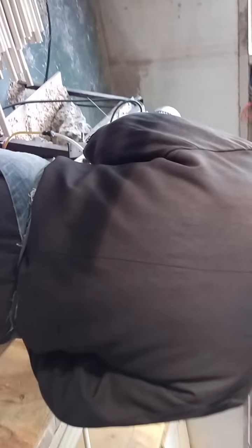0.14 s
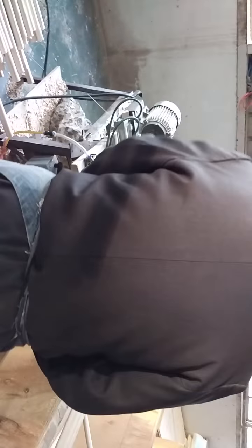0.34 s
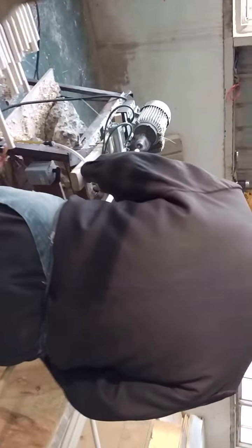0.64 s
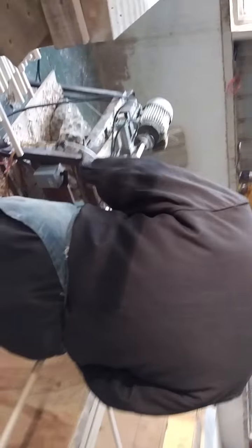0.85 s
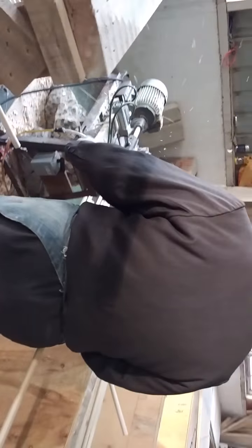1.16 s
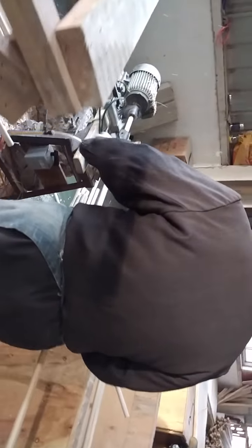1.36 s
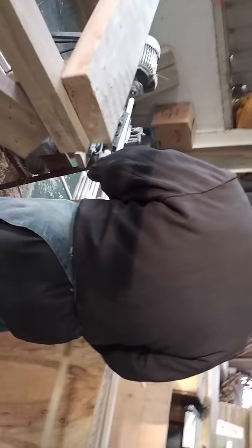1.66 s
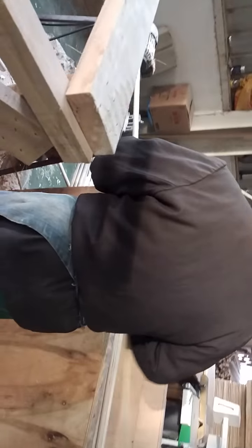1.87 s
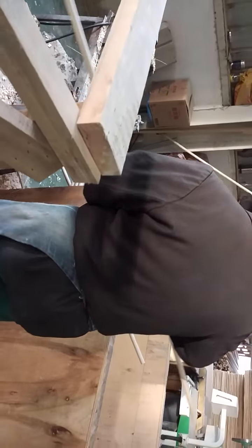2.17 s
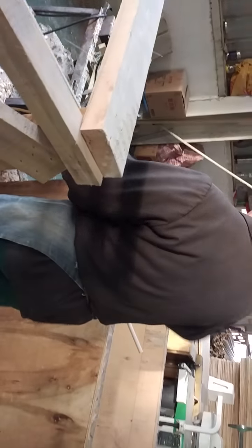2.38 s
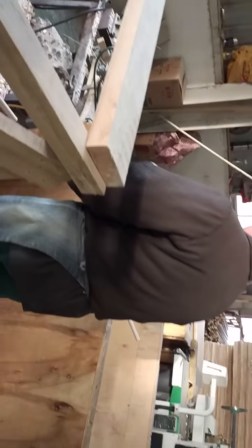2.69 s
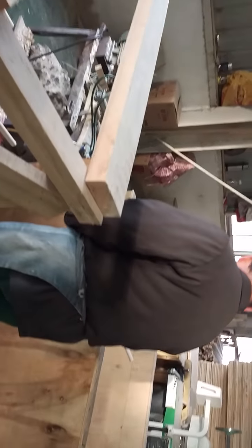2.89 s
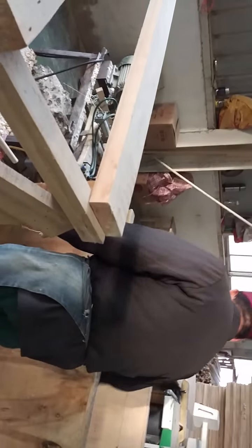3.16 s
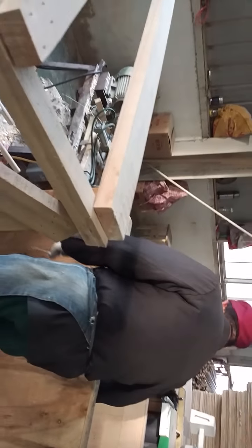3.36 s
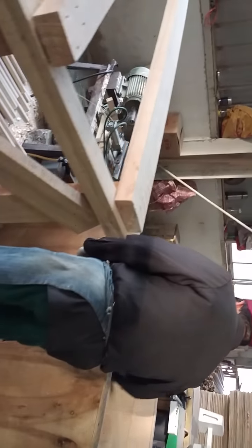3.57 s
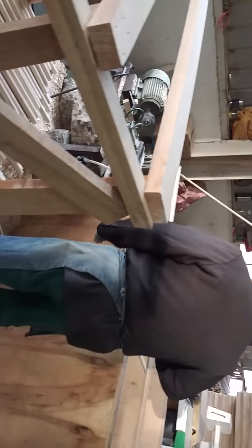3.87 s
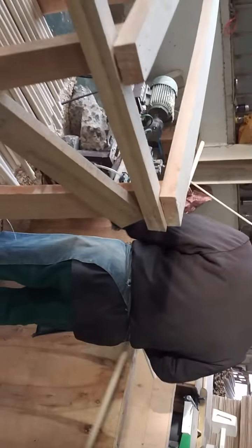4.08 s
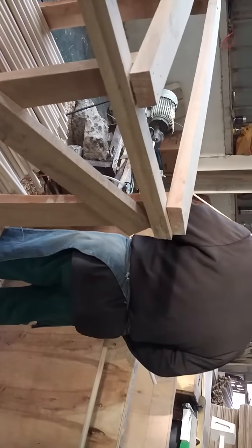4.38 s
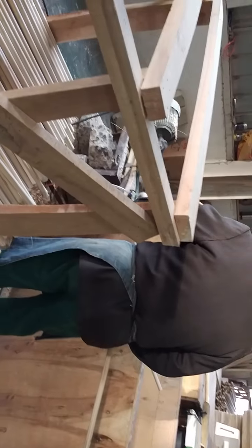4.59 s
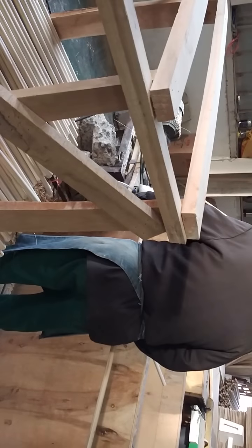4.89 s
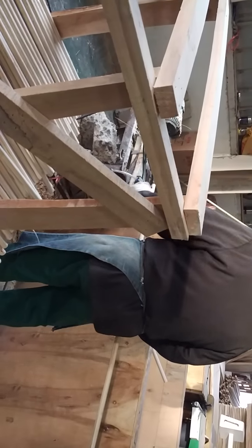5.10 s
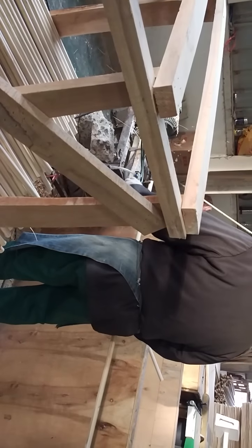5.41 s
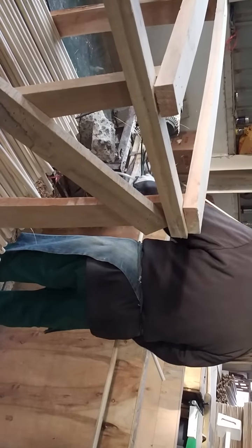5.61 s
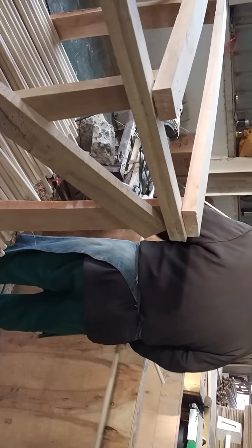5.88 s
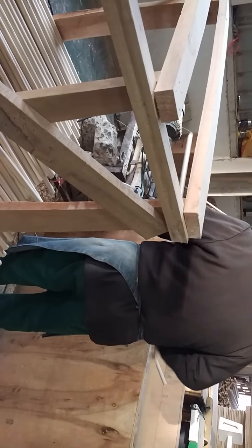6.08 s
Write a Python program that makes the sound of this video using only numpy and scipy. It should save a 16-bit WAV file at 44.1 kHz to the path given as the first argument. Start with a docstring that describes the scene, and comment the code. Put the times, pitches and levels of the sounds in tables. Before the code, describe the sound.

Spinning cutters sing with a throbbing, buzzing whine over hissing wood chips, while compressed air puffs briefly and a stick drops on a board.

```python
"""In a factory hall, a wood moulder mills thin sticks. Its two six-knife cutter heads turn at slightly
different speeds, so they sing and throb; the tones swell and fade as the listener moves through the
hall's standing waves (its loud and quiet spots). Chips rush off the knives; an air valve's puffs and
one sharp tick make the gain control dip. Halfway, a stick clacks and drops on a board."""
import sys
import numpy as np
from scipy import signal
from scipy.fft import irfft, next_fast_len
from scipy.io import wavfile
from scipy.ndimage import uniform_filter1d, map_coordinates

SR = 44100
rng = np.random.default_rng(int(sys.argv[2]) if len(sys.argv) > 2 else 0)


def materialize(psi):
    """Save the field psi as 16-bit PCM at rate SR to the path in sys.argv[1].

    A 1-D psi becomes a single channel; in a 2-D psi each row is a channel.
    """
    bounded = np.clip(np.atleast_2d(psi).T, -1, 1)
    quanta = np.round(bounded * 32767).astype(np.int16)
    wavfile.write(sys.argv[1], SR, quanta)


N = 275625
TIME = np.arange(N) / SR

# Levels are relative. "Pan" is left minus right; "lead" is how much earlier the left side hears a sound.
# where each pitch sits between the sides: f/Hz, pan/dB
BALANCE = [(100, -1.5), (200, -2.5), (600, -6), (1000, -0.5), (1700, -6), (2400, -1), (3500, -2), (4200, 3),
           (5000, 4), (6500, 10), (8200, 9), (10000, 4), (13000, 2.5), (15500, -2)]
# how much power comes straight from the machine: f/Hz, share/fraction
DIRECT_SHARE = [(100, 1), (300, 1), (800, 0.41), (1600, 1), (2400, 0.52), (4000, 0.22), (8000, 0.047),
                (15000, 0.32)]
# noise colours of the hall, air jet, tearing wood, chips and fine spray: f/Hz, level/dB
HALL_ROAR = [(20, -80), (60, -61), (110, -92), (150, -74.5), (172, -92), (190, -63), (300, -62),
             (500, -63.5), (800, -65), (1400, -59.5), (3000, -107)]
AIR_JET = [(2000, -108), (5000, -35.5), (9000, -39.5), (12000, -37.5), (15000, -38), (17000, -28),
           (21000, -53.5)]
TEARING = [(900, -139), (1500, -57), (1800, -58.5), (2400, -55.5), (2900, -55), (3300, -59), (3700, -60),
           (4000, -52.5), (4300, -66.5), (5500, -87)]
CHIP_RUSH = [(3000, -70), (3600, -91), (4350, -58.5), (4550, -58), (6000, -59.5), (6900, -57.5),
             (7700, -62), (8400, -61), (9500, -84)]
SPRAY = [(6000, -86.5), (9000, -71.5), (10700, -70), (12500, -69.5), (14500, -70), (15700, -66.5),
         (17000, -60)]
# blows on the stick and on the board: t/s, level/dB
CLACKS = [(.643, -20), (2.909, -22), (2.917, -11.5), (2.95, -20)]
THUMPS = [(2.952, -13.5), (2.963, -27), (2.975, -19), (3.005, -25), (3.04, -28)]
# the notes each one rings with: f/Hz, level/dB, time to fade by 60 dB/s
STICK_MODES = [(1950, -3, .025), (2280, -1, .025), (2750, 0, .02), (3300, -1, .02), (3650, -3, .02),
               (4700, -2, .015), (5400, 0, .015), (6300, -3, .012)]
BOARD_MODES = [(150, -14, .25), (194, -4, .1), (253, -2, .09), (315, -1, .07), (390, -1.5, .05),
               (479, -2.5, .05), (660, -3.5, .035), (810, -3.5, .04), (900, -8, .035)]
# puffs of the valve, and one sharp tick that makes the volume dip: t/s, rise/s, hold/s, level/dB
PUFFS_AND_TICK = [(.508, .03, .012, -15), (1.683, .016, .012, -6), (1.995, .001, .001, -15),
                  (4.762, .005, .002, -17), (4.775, .014, .012, -16), (5.952, .012, .01, -13)]
# early echoes off wooden frames: delay/s
FRAME_DELAYS_S = [.0016, .0031, .0052]
# brief bands of noise (squeals, swelling cutter tones, low side tones and one short hiss):
# middle t/s, length/s, f/Hz, width/Hz, level/dB
BRIEF_BANDS = [(.12, 0.36, 2287, 22, -25.5), (.1, 1, 764, 20, -34.5), (.117, 0.58, 3180, 360, -27.5),
               (0.132, .097, 7900, 200, -29), (.386, 0.23, 2940, 230, -27), (1.247, 0.71, 2176, 44, -30.5),
               (2.48, .2, 7700, 250, -28), (2.837, .13, 2780, 180, -29), (3.513, 0.14, 4820, 600, -22),
               (3.517, 0.11, 3460, 220, -25.5), (4.783, 0.021, 6800, 2400, -25),
               (4.843, .14, 6840, 170, -28), (4.9, 0.72, 802, 16, -44), (5.56, 0.51, 3480, 260, -30),
               (5.635, 0.11, 6270, 120, -26)]
# how the cut grows louder and softer: t/s, knife bite/dB, chip rush/dB, fine spray/dB
CUT = [(0.0, 1.5, 2.5, -1.5), (0.37, 2, 0, -4), (.515, 5, -0.5, 3), (.54, 0, -1.5, 2), (0.65, 2.5, -1.5, 0),
       (1.07, -0.5, 1.5, 3), (1.57, -1, -1.5, 5.5), (1.8, 0, -0.5, 3.5), (2.75, 0.7, -0.1, 1.9),
       (4.12, -0.2, 1, 4.5), (5.8, 0.5, 1.6, 1.3), (6.25, 1.5, 0.5, 5)]
# turning rates of the heads, which sag and recover with the load: t/s, f/Hz
UPPER_SPEED = [(0, 93.89), (.65, 93.89), (1.3, 93.76), (1.65, 93.76), (2.1, 93.97), (2.5, 93.96),
               (2.9, 93.82), (3.2, 93.83), (3.5, 93.95), (4, 93.89), (4.5, 94.03), (5.1, 93.98),
               (5.6, 94.1), (6.25, 93.99)]
LOWER_SPEED = [(0, 95.37), (.35, 95.17), (.9, 95.35), (3, 95.35), (3.9, 95.41), (4.6, 95.33), (5.2, 95.42),
               (6.25, 95.37)]
# buzz of uneven knives: order (multiple of the turning rate), upper head level/dB, lower head level/dB
BUZZ_ORDERS = [(2, -60.0, -53.5), (3, -55.5, -53.5), (4, -54.5, -47.0), (5, -53.0, -49.5),
               (7, -55.0, -48.5), (8, -45.5, -56.0), (9, -50.5, -48.5), (10, -43.5, -47.5),
               (11, -44.5, -45.0), (13, -39.5, -44.0), (14, -36.0, -49.0), (15, -46.0, -48.0),
               (16, -41.5, -42.0), (17, -41.5, -36.0), (19, -37.0, -38.0), (20, -36.5, -42.0),
               (21, -42.5, -46.0), (22, -45.0, -47.0), (23, -37, -40), (25, -42.0, -45.5),
               (26, -38.5, -45.0), (27, -42.0, -45.5), (28, -44.5, -45.5), (29, -41.5, -47.0),
               (31, -40.5, -45.5), (32, -43.0, -49.5), (33, -46.5, -53.5), (34, -46.0, -53.0),
               (35, -47.0, -46.5)]
# the buzz above those orders: f/Hz, level/dB
BUZZ_TREBLE = [(3300, -42), (3500, -43), (3750, -53), (4050, -46), (4350, -53), (4600, -40.5), (5000, -43),
               (5400, -41), (6500, -43), (7350, -41), (7700, -46), (8000, -44), (9000, -51), (10800, -50),
               (13000, -53), (15500, -49)]
# orders that stand out of the treble: multiples of the knife rate (six blows a turn)
STRONG_ORDERS = np.arange(54, 132, 6)
# each head's hum (at the knife rate), drone (twice it) and whine (three times): t/s, level/dB, pan/dB
UPPER_HUM = [(0, -33, -16), (.4, -30, -4), (.85, -31.5, -5), (1.8, -41.5, -18), (2.5, -27.5, -13),
             (2.9, -26, -7), (3.9, -38, -5), (5, -37, -22), (6.25, -33, -16)]
UPPER_DRONE = [(0, -26.5, -6), (.47, -26, -6), (.75, -32.5, -3), (1.04, -35.5, -10), (1.28, -32.5, -6),
               (1.6, -39, 5), (1.8, -32.5, -4), (2.3, -31, 7), (2.8, -32, 0), (3.92, -38.5, 3),
               (4.24, -31, -15), (4.68, -29.5, -9), (5, -25, -15), (5.76, -22.5, -8), (6.25, -23.5, -14)]
UPPER_WHINE = [(0, -37, -5), (.12, -39, -6), (.32, -27, -4), (.52, -29.5, -4), (.76, -20.5, -3),
               (1.2, -18.5, -10), (1.4, -25, -12), (1.68, -42, 2), (1.8, -34, -6), (2.2, -31.5, -7),
               (2.48, -23.5, -8), (2.76, -38, 0), (3.3, -36, -4), (3.7, -24, -8), (4, -19.5, -8),
               (4.4, -27.5, -8), (4.84, -29, -11), (5.32, -24, -7), (5.56, -26, -4), (5.85, -21, -6),
               (6.25, -23.5, -9)]
LOWER_HUM = [(0, -37.5, -3), (1.4, -39, -3), (2.2, -47, -6), (3.5, -42, -8), (6.25, -41, -8)]
LOWER_DRONE = [(0.0, -28.0, -4), (0.6, -31.0, 0), (1.0, -30.5, 4), (1.52, -35.0, 2), (1.72, -40.0, 6),
               (1.76, -37.5, -8), (2.16, -32.0, -12), (2.6, -35.0, -7), (3.08, -28.5, -15),
               (3.8, -32.5, -6), (4.48, -27.5, -5), (5.32, -35.0, -5), (5.96, -28.0, 0), (6.24, -35.0, 1)]
LOWER_WHINE = [(0, -34.5, 4), (.96, -35, -15), (1.08, -38, -7), (1.32, -26.5, -5), (1.48, -26.5, -11),
               (1.72, -36, -5), (2.2, -38, -4), (2.52, -29.5, -9), (2.96, -36, -11), (3.12, -29, -9),
               (3.7, -22.5, -10), (4.3, -34.5, -7), (4.6, -29, -2), (5.44, -32, -6), (5.72, -25, -5),
               (6, -32, -3), (6.25, -28, -5)]
# each head's overtones (harmonics 4 to 8) at rest: level/dB
OVERTONE_DB = {"upper": [-39, -36.5, -40.5, -45, -41.5], "lower": [-44, -43, -45, -48, -45]}
# their swells: middle t/s, length/s, head, harmonic, level/dB
OVERTONE_SWELLS = [(.17, .22, "lower", 4, -27), (.1, .25, "lower", 5, -31), (.4, .16, "upper", 5, -26),
                   (1.15, .25, "upper", 4, -24.5), (1.14, .16, "upper", 6, -30.5),
                   (1.43, .16, "upper", 7, -32), (1.46, .16, "upper", 8, -30), (1.5, .15, "upper", 5, -32),
                   (1.5, .22, "upper", 4, -27), (1.93, .2, "upper", 5, -34), (2.8, .16, "upper", 5, -29),
                   (2.97, .2, "upper", 4, -32), (3.45, .25, "lower", 4, -35),
                   (4.07, .17, "upper", 5, -31.5), (4.5, .3, "upper", 4, -32), (5, .4, "upper", 5, -29.5),
                   (5.3, .3, "lower", 4, -34.5), (5.5, .15, "upper", 6, -35.5),
                   (5.9, .3, "upper", 6, -35.5), (5.85, .3, "upper", 5, -35), (6.22, .12, "upper", 4, -31)]
# standing waves swing each head's drone between the sides: t/s, lead/s
DRONE_LEAD = {"upper": [(0, .00032), (.75, .00042), (1.3, .00017), (1.9, .00026), (2.25, .00008), (3.3, 0),
              (3.7, -.00028), (4.3, -.00047), (5.6, -.00058), (6.25, -.00051)], "lower": [(0, .00036),
              (1, .0004), (1.5, -.00028), (2.4, -.00029), (3.4, -.00043), (5.2, -.00067), (6.25, -.00064)]}
# hum, whine and each overtone at the start: lead/s
TONE_LEADS_S = [.00026, .00038, .00036, .00035, .00032, .0003, .00025]


def from_db(db):
    """Turn decibels into a gain to multiply by."""
    return 10 ** (np.asarray(db) / 20)


def in_time(rows):
    """Join a table's points with straight lines: one curve for each column after the time."""
    times, *columns = np.transpose(rows)
    return [np.interp(TIME, times, column) for column in columns]


def at_hz(points, hz):
    """Look up a table by pitch, with every octave equally wide."""
    known_hz, values = np.transpose(points)
    return np.interp(np.log(hz + 1e-9), np.log(known_hz), values)


def drift(rate):
    """A random wander, about 1 in size, with `rate` new values a second."""
    steps = rng.standard_normal(4096)
    return np.interp(TIME * rate, np.arange(len(steps)), steps) * np.sqrt(1.5)


def swell(middle_s, length_s):
    """A smooth rise and fall of height 1."""
    return np.exp(-2 * ((TIME - middle_s) / length_s) ** 2)


def random_waves(*shape):
    """Random wave sizes and phases, as complex numbers of average power 1."""
    return (rng.standard_normal(shape) + 1j * rng.standard_normal(shape)) / np.sqrt(2)


def to_stereo(direct, echoes, hz, lead_s=0.00038):
    """Direct sound reaches the left side first; the hall's echoes differ on each side."""
    share = np.clip(at_hz(DIRECT_SHARE, hz), 0, 1)
    lead = np.exp(1j * np.pi * hz * lead_s)
    tilt = from_db(at_hz(BALANCE, hz))
    left = tilt * (np.sqrt(share) * direct * lead + np.sqrt(1 - share) * echoes[0])
    right = np.sqrt(share) * direct / lead + np.sqrt(1 - share) * echoes[1]
    return np.array([left, right]) * np.sqrt(2 / (1 + tilt ** 2))


def rush(colour):
    """Steady stereo noise, shaped by a table of pitches and levels."""
    size = next_fast_len(N, True)
    hz = np.arange(size // 2 + 1) * SR / size
    waves = to_stereo(random_waves(len(hz)), random_waves(2, len(hz)), hz)
    return irfft(waves * from_db(at_hz(colour, hz)) * np.sqrt(size * SR / 2), size)[:, :N]


def resonance(noise, hz, width_hz):
    """Keep one narrow band of a noise and bring it to power 1."""
    edges_hz = [hz - width_hz / 2, hz + width_hz / 2]
    band = signal.sosfilt(signal.butter(2, edges_hz, "band", fs=SR, output="sos"), noise)
    return band / np.sqrt(np.mean(band ** 2))


def hall_roar():
    """The hall's low roar wavers a little."""
    return rush(HALL_ROAR) * from_db(.9 * drift(12))


def wood_knocks(blows, modes, pan_db, echo_db, echo_s):
    """Each blow rings all the wood's notes, neighbours swinging opposite ways; the hall echoes it."""
    t = TIME[:SR // 2]
    direct = np.zeros(N + len(t))
    for start_s, blow_db in blows:
        start = int(start_s * SR)
        for k, (hz, mode_db, fade_s) in enumerate(modes):
            fade = from_db(blow_db + mode_db + rng.normal(0, 1) - 60 * t / fade_s)
            direct[start:start + len(t)] += (-1) ** k * fade * np.sin(2 * np.pi * hz * t)
    tail = rng.standard_normal((2, len(t))) * from_db(-60 * t / echo_s)
    tail /= np.sqrt(np.sum(tail ** 2, axis=1, keepdims=True))
    echo = signal.fftconvolve(direct[None, :N], tail, axes=1)[:, :N]
    return (direct[:N] + from_db(echo_db) * echo) * from_db([[pan_db / 2], [-pan_db / 2]])


def puffs_and_tick(tail_s, hall_db, hall_s):
    """Jets of compressed air, and one sharp tick, build, hold and die away; a soft hiss lingers."""
    loudness = 0
    for start_s, rise_s, hold_s, db in PUFFS_AND_TICK:
        rising = np.clip((TIME - start_s) / rise_s, 0, 1)
        after_s = np.maximum(TIME - start_s - rise_s - hold_s, 0)
        burst = np.exp(-np.minimum(after_s, 1) / tail_s)
        lingering = from_db(hall_db) * np.exp(-after_s / hall_s)
        loudness += from_db(db) * rising * np.maximum(burst, lingering)
    return loudness * rush(AIR_JET)


def frame_echoes(sound, echo_db, sway_s):
    """Echoes off stacked wooden frames shift as the listener moves, so a hollow colour slides about."""
    out, gain = sound.copy(), from_db(echo_db)
    for delay_s in FRAME_DELAYS_S:
        for side in (0, 1):
            earlier = TIME - delay_s * rng.uniform(.8, 1.2) - sway_s * drift(2)
            out[side] += gain * np.interp(earlier, TIME, sound[side], left=0)
    return out / np.sqrt(1 + len(FRAME_DELAYS_S) * gain ** 2)


def cutting_noise():
    """Wood tears, and chips and fine spray rush off the knives; each noise flutters on its own."""
    bite_db, chips_db, spray_db = in_time(CUT)
    tearing = rush(TEARING) * from_db(bite_db - 3.8 + drift(25))
    chips = rush(CHIP_RUSH) * from_db(chips_db - 1.5 + drift(28))
    spray = rush(SPRAY) * from_db(spray_db + 0.8 + 1.1 * drift(25))
    return tearing + chips + spray


def noise_bands(steel_start_s=1.45, steel_rise_s=0.14):
    """Rubbing rings the cutter's steel and frays the whine; brief bands of noise swell and fade."""
    noise = rush([(1, 0), (SR, 0)])  # equally strong at every pitch
    ringing = np.clip((TIME - steel_start_s) / steel_rise_s, 0, 1)
    steel = from_db(-29) * ringing * resonance(noise, hz=7385, width_hz=360)
    frayed_whine = from_db(in_time(UPPER_WHINE)[0] - 9.5) * resonance(noise, hz=1770, width_hz=190)
    out = steel + frayed_whine
    for middle_s, length_s, hz, width_hz, db in BRIEF_BANDS:
        out += from_db(db) * swell(middle_s, length_s) * resonance(noise, hz, width_hz)
    return out


def spin(speed_hz, jitter):
    """Count the turns of a head whose speed trembles with the grain of the wood."""
    return np.cumsum(speed_hz * (1 + jitter * drift(25))) / SR


def knife_buzz(turns, speed_hz, orders_db, treble_db, change_db, count=80, size=2048):
    """Every turn repeats a pattern of knife blows, which changes as the stick feeds through."""
    orders = np.arange(170)
    hz = orders * np.mean(speed_hz)
    listed = np.array(BUZZ_ORDERS)[:, 0].round().astype(int)
    strong_db = 4.8 * np.isin(orders, STRONG_ORDERS)
    gain = from_db(at_hz(BUZZ_TREBLE, hz) + treble_db + strong_db) * (orders > listed.max())
    gain[listed] = from_db(orders_db)
    # the middle of the buzz follows the bite of the knives, its top the rush of chips
    bite_db, chips_db = [curve[::N // count][:count, None] for curve in in_time(CUT)[:2]]
    cut_db = bite_db * np.interp(hz, [500, 2500, 4500], [.2, 1, 0])
    cut_db += chips_db * np.interp(hz, [2500, 4500, 9000, 12000], [0, 1, 1, 0])
    # short waves follow the wood's grain more closely than long ones
    fresh = np.clip(from_db(change_db) * np.sqrt(hz / 1000), 0, 1)
    lasting = np.exp(2j * np.pi * rng.random((3, 1, len(hz))))
    paths = np.sqrt(1 - fresh ** 2) * lasting + fresh * random_waves(3, count, len(hz))
    waves = to_stereo(paths[0], paths[1:], hz)
    waves *= gain * from_db(cut_db) / np.sqrt(np.mean(abs(waves) ** 2, axis=(0, 1)))
    patterns = irfft(waves, size) * size / np.sqrt(2)  # `count` patterns a side, each one turn long
    place = [np.linspace(0, count - 1, N), turns % 1 * size]  # which pattern, and how far round
    return np.array([map_coordinates(side, place, order=1, mode="grid-wrap") for side in patterns])


def head_tones(head, low_tones, overtone_pan_db=-5):
    """Level, pan and lead of a head's eight harmonics as they reach the moving listener."""
    tones = [in_time(table) for table in low_tones]
    for harmonic, resting_db in enumerate(OVERTONE_DB[head], len(low_tones) + 1):
        swelling = sum((from_db(db) * swell(middle_s, length_s)) ** 2
                       for middle_s, length_s, which, number, db in OVERTONE_SWELLS
                       if (which, number) == (head, harmonic))
        resting = from_db(resting_db + 2 * drift(6.4)) ** 2
        tones.append([10 * np.log10(resting + swelling), overtone_pan_db])
    leads = [lead_s * (1 + .025 * TIME) for lead_s in TONE_LEADS_S]  # they grow as the listener turns
    leads.insert(1, in_time(DRONE_LEAD[head])[0])
    return [(*tone, lead) for tone, lead in zip(tones, leads)]


def knife_song(turns, speed_hz, tones, wobble, rough, knives=6, runout=.04):
    """Knives chop the air at the table edge like a siren; the wood roughens all the tones together."""
    out = np.zeros((2, N))
    # runout: unequal knives make each tone pulse once a turn
    unevenness = rough * drift(130) + runout * np.cos(2 * np.pi * turns)
    knife_angle = 2 * np.pi * knives * turns + rough * drift(130)
    sway = wobble * drift(5.9)
    for harmonic, (level_db, pan_db, lead_s) in enumerate(tones, 1):
        gain = 2 * from_db(level_db + drift(22)) * (1 + harmonic * unevenness)
        side_angle = np.pi * knives * speed_hz * lead_s + sway
        phase = rng.uniform(0, 2 * np.pi)
        for side, sign in enumerate((1, -1)):
            side_gain = gain / np.sqrt(1 + from_db(-2 * sign * pan_db))
            out[side] += side_gain * np.sin(harmonic * (knife_angle + sign * side_angle) + phase)
    return out


def moulder():
    """Two heads sing and buzz; the noise of the cut pulses as the upper one turns."""
    upper_hz, lower_hz = in_time(UPPER_SPEED)[0], in_time(LOWER_SPEED)[0]
    upper_turns, lower_turns = spin(upper_hz, jitter=0.000718), spin(lower_hz, jitter=0.00077)
    upper_tones = head_tones("upper", [UPPER_HUM, UPPER_DRONE, UPPER_WHINE])
    song = knife_song(upper_turns, upper_hz, upper_tones, wobble=.05, rough=.03)
    lower_tones = head_tones("lower", [LOWER_HUM, LOWER_DRONE, LOWER_WHINE])
    song += knife_song(lower_turns, lower_hz, lower_tones, wobble=.045, rough=.025)
    _, upper_db, lower_db = np.transpose(BUZZ_ORDERS)
    buzz = knife_buzz(upper_turns, upper_hz, upper_db, treble_db=-2.5, change_db=-6.5)
    buzz += knife_buzz(lower_turns, lower_hz, lower_db, treble_db=-5.5, change_db=-4.5)
    angle = 2 * np.pi * upper_turns
    pulsing = 1 + .06 * np.cos(angle) + .07 * np.cos(2 * angle) + .05 * np.cos(6 * angle)
    grain = from_db(.45 * drift(32))
    noise = frame_echoes(cutting_noise(), echo_db=-7, sway_s=.00008) + noise_bands()
    return song + grain * (from_db(2) * buzz + pulsing * noise)


def scene():
    """The hall, the knocking wood, the moulder, the puffs and the tick, added together."""
    hall = hall_roar()
    stick = wood_knocks(CLACKS, STICK_MODES, pan_db=-1, echo_db=-5, echo_s=.15)
    board = wood_knocks(THUMPS, BOARD_MODES, pan_db=-3, echo_db=-6, echo_s=.5)
    return hall + stick + board + moulder() + puffs_and_tick(tail_s=0.0077, hall_db=-19.5, hall_s=0.053)


def gain_control(sound, threshold_db, release_s):
    """Sound over the threshold turns the volume down at once; it comes back gradually."""
    power = uniform_filter1d(np.mean(sound ** 2, axis=0), size=220)
    excess_db = np.maximum(10 * np.log10(np.maximum(power, 1e-12)) - threshold_db, 1e-9)
    # each peak dies away until a higher one takes over
    held_db = np.exp(np.maximum.accumulate(np.log(excess_db) + TIME / release_s) - TIME / release_s)
    return sound * from_db(-uniform_filter1d(held_db, size=130))


def record(dry, bass_hz=165, top_hz=15720):
    """Gain control, then steep cuts of the bass (a trace gets through) and the highest treble."""
    ducked = gain_control(dry, threshold_db=-12.5, release_s=0.043)
    bass_cut = signal.butter(6, bass_hz, "high", fs=SR, output="sos")
    top_cut = signal.ellip(12, .2, 80, top_hz, fs=SR, output="sos")
    thin = signal.sosfilt(bass_cut, ducked) + from_db(-39) * ducked
    return signal.sosfilt(top_cut, thin)


dry = scene()
out = record(dry)
materialize(out)
```